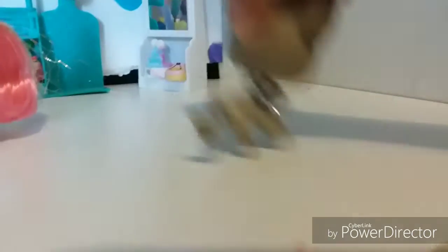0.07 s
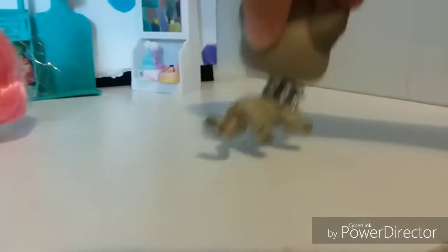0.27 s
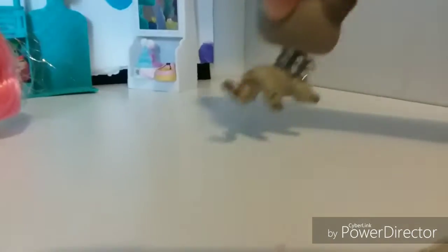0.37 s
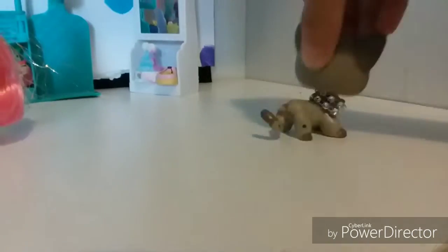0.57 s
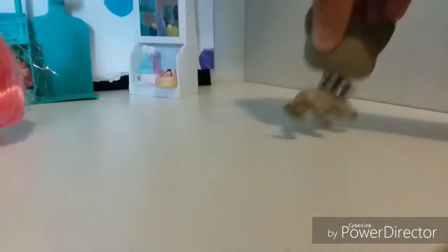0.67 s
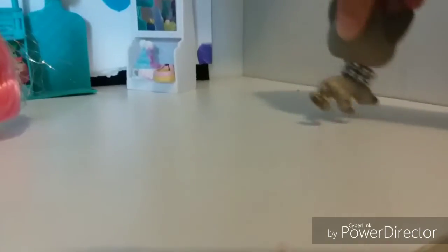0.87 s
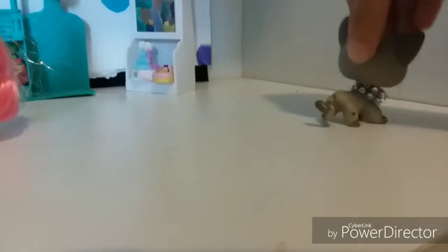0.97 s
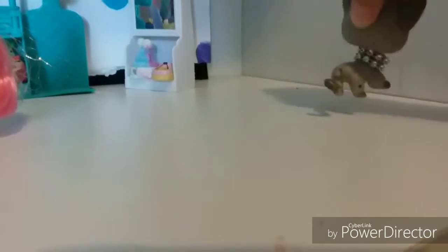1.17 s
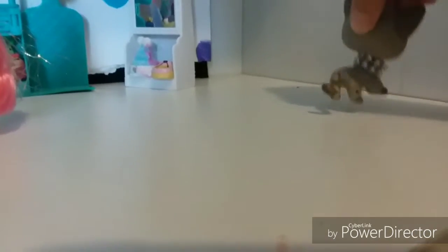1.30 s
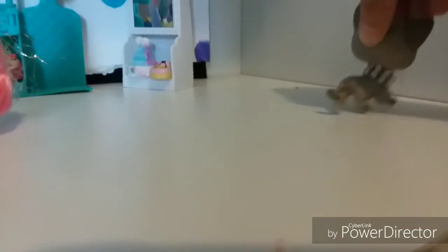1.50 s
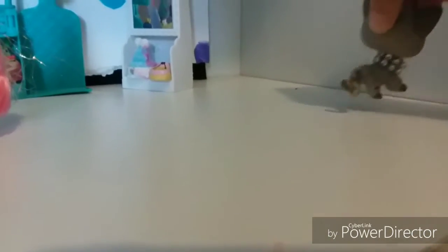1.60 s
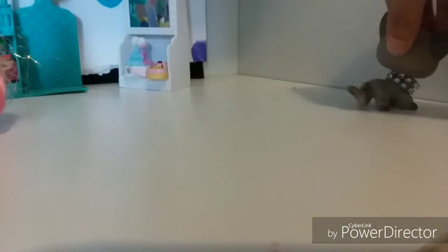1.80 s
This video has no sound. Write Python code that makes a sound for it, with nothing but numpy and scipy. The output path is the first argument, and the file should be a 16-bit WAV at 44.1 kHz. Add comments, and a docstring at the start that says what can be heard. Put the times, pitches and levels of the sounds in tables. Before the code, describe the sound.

Plastic toy knocked step by step across a hard table indoors, close, over low hum and hiss

```python
"""Throughout: low rumble and a narrow hum under the microphones' hiss, all shaped noise but the hum's steady sine.
A small plastic figure hops along a hard tabletop, close to a stereo recorder standing on it: one landing has
begun just before 0 s, the others follow near 0.2, 0.6, 1.1 and 1.5 s. A landing is a cluster of contacts: one
foot, the body's weight, a light rebound. Each contact sums decaying tabletop modes, a plastic clatter of
decaying noise and a room tail."""
import sys
import numpy as np
from scipy import signal
from scipy.fft import rfft, irfft, next_fast_len
from scipy.io import wavfile

SR = 44100
rng = np.random.default_rng(int(sys.argv[2]) if len(sys.argv) > 2 else 0)


def unload_wav(signal):
    """Save mono or channel-first audio to the path in sys.argv[1] as 16-bit WAV at rate SR, clipped to [-1, 1]."""
    wavfile.write(
        sys.argv[1],
        SR,
        np.round(np.clip(np.atleast_2d(signal).T, -1, 1) * 32767).astype(np.int16),
    )


def convert_level_to_amplitude(level_db):
    """Map a level in decibels to its linear amplitude factor."""
    exponent = np.asarray(level_db, float) / 20
    return 10 ** exponent


N = 81585  # samples


def unit(x):
    """Scales to rms 1 over both channels."""
    return x / np.sqrt(np.mean(x ** 2) + 1e-20)


def along(points, hz):
    """Interpolates (frequency [Hz], value) points on a log frequency axis."""
    f, v = np.transpose(points)
    return np.interp(np.log(hz + 1), np.log(f + 1), v)


def balance(left_over_right_db):
    """Left and right gains, the level difference split evenly."""
    return convert_level_to_amplitude([[left_over_right_db / 2], [-left_over_right_db / 2]])


def filtered(x, response):
    """Multiplies the spectrum of x by a response of frequency."""
    n = x.shape[-1]
    m = next_fast_len(n + 8192)
    return irfft(rfft(x, m) * response(np.fft.rfftfreq(m, 1 / SR)), m)[..., :n]


def stereo_noise(n, gain, alike):
    """Coloured noise; mid and side shares set the left-right correlation per frequency."""
    def response(hz):
        angle = np.arccos(np.clip(alike(hz), -1, 1)) / 2
        return gain(hz) * np.array([np.cos(angle), np.sin(angle)])
    mid, side = filtered(rng.standard_normal((2, n)), response)
    return np.array([mid + side, mid - side])


def dying(noise, t60_points):
    """Decays each band of the noise exponentially at its own t60."""
    hz, t, z = signal.stft(noise, SR, nperseg=128)
    t60_s = along(t60_points, hz)[:, None]
    decayed = signal.istft(z * convert_level_to_amplitude(-60 * t / t60_s), SR, nperseg=128)[1]
    return decayed[:, :noise.shape[1]]


def hiss():
    """Microphone self-noise, independent at the two ports."""
    # hiss spectrum: (frequency [Hz], relative level [dB])
    spectrum = [(300, 10), (1000, 6), (3000, 2), (6000, -1.5), (10000, -0.5), (15000, 0.5), (16000, -5.5)]
    noise = stereo_noise(N, lambda hz: convert_level_to_amplitude(along([(100, -22)] + spectrum, hz)), lambda hz: 0 * hz)
    return convert_level_to_amplitude(-76) * unit(noise)


def rumble():
    """Low room noise, nearly the same at both ports in the bass."""
    # rumble spectrum: (frequency [Hz], relative level [dB])
    spectrum = [(22, -47), (45, -18), (62, 0.5), (88, -1.5), (120, -8.5), (170, -9.5), (290, -21),
                (340, -35.5), (435, -22.5), (520, -48.5), (900, -62)]
    # rumble at the two ports: (frequency [Hz], left-right correlation [-1..1])
    likeness = [(60, .985), (100, .96), (290, .89), (640, .4)]
    points = [(8, -100)] + spectrum + [(3000, -100)]
    noise = stereo_noise(N, lambda hz: convert_level_to_amplitude(along(points, hz)), lambda hz: along(likeness, hz))
    return convert_level_to_amplitude(-57) * unit(noise)


def hum():
    """A steady sine blurred by narrow-band noise at the same pitch."""
    pitch_hz, width_hz = 220.9, 12
    steady_power, alike = 0.7, 0.95
    level_db, pan_db = -59, 2.5
    blur = unit(stereo_noise(N, lambda hz: 1 / (1 + (2 * (hz - pitch_hz) / width_hz) ** 4),
                             lambda hz: alike + 0 * hz))
    tone = np.sqrt(2) * np.sin(2 * np.pi * pitch_hz * np.arange(N) / SR)
    mixed = np.sqrt(steady_power) * tone + np.sqrt(1 - steady_power) * blur
    return convert_level_to_amplitude(level_db) * balance(pan_db) * mixed


def room_tail(hit):
    """Left port of the hit convolved with fresh stereo noise, each band decaying at its own rate."""
    # room decay: (frequency [Hz], t60 [s])
    decay = [(200, .2), (800, .17), (2000, .18), (5000, 0.14), (12000, 0.1698)]
    # room tail at the two ports: (frequency [Hz], left-right correlation [-1..1])
    likeness = [(100, 0.81), (300, 1), (700, 0.26), (2000, .2)]
    level_db, pan_db = -18.5, 1
    tail = dying(stereo_noise(SR // 2, np.ones_like, lambda hz: along(likeness, hz)), decay)
    wet = signal.fftconvolve(hit[:1], tail / np.linalg.norm(tail[0]), axes=1)
    return convert_level_to_amplitude(level_db) * balance(pan_db) * wet


def tabletop_ring(t, build_s, colour_db, spot_hz):
    """Decaying sines, one per mode; low modes build up slower, modes near spot_hz are favoured."""
    # tabletop modes: [frequency [Hz]]
    mode_hz = [128, 203, 297, 402, 590, 675, 762, 900, 1064, 1172, 1207, 1309, 1560, 1750, 1836, 2050, 2238,
               2340, 2600, 2870, 3100, 3520, 3900, 4850]
    # same modes: (relative level [dB], t60 [s], left over right [dB], left phase lead [rad])
    modes = [(-13, 0.12, 3.5, 1.25), (-7, 0.19, 5.5, 7), (-4.5, .07, -8.5, 0.18), (-11.5, 0.13, -1.5, 1),
             (-4.5, 0.12, 3.5, 2.58), (-10, 0.064, 8, -0.4), (-4, 0.044, 4, 0.3), (-13.5, .09, -4, 1.2),
             (-13.5, 0.097, 9.5, -3.7), (-7, 0.087, 4, -2), (-4.5, 0.079, 3.5, 0.27), (-6, .06, 2, -0.5),
             (-1.5, 0.047, 2, 1.5), (-6, .05, 16, 2.5), (-7.5, 0.071, 7, 1.5), (-4, 0.047, 8, -1.8),
             (-3.5, .045, 3, -6.1), (-12.5, 0.017, 7.5, -2.4), (-4.5, 0.024, -3.5, -4.6),
             (-10.5, .04, -1.5, -1.82), (-15.5, 0.059, 4.5, -2), (-13, 0.036, 5, 2.9), (-17, .05, -1, -2),
             (-32.5, .04, 3.5, 1)]
    favour_db, favour_octaves = 7, 0.17
    scatter_db, build_cycles = 2, 0.97
    hz = np.array(mode_hz)[:, None]
    level_db, t60_s, pan_db, lead_rad = np.transpose(modes)[:, :, None]
    octaves_off = np.log2(hz / spot_hz)
    level_db = level_db + favour_db * np.exp(-0.5 * (octaves_off / favour_octaves) ** 2)
    level_db = level_db + colour_db(hz) + scatter_db * rng.standard_normal(hz.shape)
    envelope = convert_level_to_amplitude(level_db - 60 * t / t60_s)
    envelope = envelope * (1 - np.exp(-t / (build_s + build_cycles / hz)))
    phase = 2 * np.pi * hz * t + rng.uniform(0, 2 * np.pi, hz.shape)
    left = np.sum(envelope * convert_level_to_amplitude(pan_db / 2) * np.sin(phase + lead_rad / 2), axis=0)
    right = np.sum(envelope * convert_level_to_amplitude(-pan_db / 2) * np.sin(phase - lead_rad / 2), axis=0)
    return np.array([left, right])


def plastic_clatter(t, build_s, colour_db):
    """Noise burst with band-wise decay, weaker and later at the right port."""
    # clatter spectrum: (frequency [Hz], relative level [dB])
    spectrum = [(240, -35), (400, -8.5), (940, -2), (1430, -12), (2300, -5), (3000, -5), (4000, -12.5),
                (5500, -26.5), (8000, -34), (9300, -42), (12500, -39.5), (15300, -44), (16000, -60.5)]
    # clatter decay: (frequency [Hz], t60 [s])
    decay = [(400, 0.0706), (1500, 0.074), (4000, 0.028), (12000, 0.047)]
    level_db, pan_db, alike, lag_s = 14.5, 10, 0.5, 0.0004
    noise = stereo_noise(len(t), lambda hz: convert_level_to_amplitude(along(spectrum, hz) + colour_db(hz)),
                         lambda hz: alike + 0 * hz)
    left, right = dying(noise, decay) * (1 - np.exp(-t / build_s))
    late_right = np.pad(right, (round(lag_s * SR), 0))[:len(t)]
    return convert_level_to_amplitude(level_db) * balance(pan_db) * np.array([left, late_right])


def contact(build_s, thump_db, knock_db, clack_db, click_db, spot_hz):
    """One contact: modal ring plus clatter, both tilted by the contact's own colour."""
    # colour bands, thump, knock, main ring (0 dB), clack, click: [frequency [Hz]]
    band_hz = [250, 650, 1200, 2500, 7000]
    colour = list(zip(band_hz, (thump_db, knock_db, 0, clack_db, click_db)))
    colour_db = lambda hz: along(colour, hz)
    t = np.arange(SR // 3) / SR
    return tabletop_ring(t, build_s, colour_db, spot_hz) + plastic_clatter(t, build_s, colour_db)


def figure():
    """Sums the hopping figure's contacts, each followed by its own room tail."""
    # contacts: (time [s], level [dB], build-up [s], thump [dB], knock [dB], clack [dB], click [dB],
    # pitch favoured by the spot [Hz]); colour columns are relative to the usual colour
    contacts = [(-.045, -24.5, 0.006, -3.5, 5, 1, 8, 940), (.021, -54, 0.00059, 2, -1.5, -12.5, -13, 2200),
                (0.194, -76.5, 0.00046, -5, 9, -1, -14, 2130), (0.2177, -34, 0.0028, 13, 8.5, 3.5, 11, 656),
                (.228, -17.5, 0.0019, -1, -8.5, 0.5, 5.5, 2850),
                (0.263, -42, 0.0022, -12, -12, 1.5, 5, 1760), (0.311, -52, 0.00039, 0, 6, 2, 12, 725),
                (0.629, -30, 0.0023, -1, -7, -5, 7.5, 780), (.6425, -22.5, 0.0011, -5, -5.5, 2, 1.5, 1470),
                (0.6493, -28.5, 0.00042, -18.5, 2, -2.5, 3, 1195),
                (.713, -52.5, 0.00025, 11, 0.5, 0, 18, 690), (1.051, -42, .001, -2.5, 1.5, -13.5, -2, 940),
                (1.058, -45, .002, 12, 3, -22, -8, 255), (1.069, -45.5, 0.00089, -5.5, 9, -10, 1, 3520),
                (1.081, -34.5, 0.00082, -10, 5, -5.5, -25.5, 1216),
                (1.133, -49.5, .0005, 5, 4, -1, 6.5, 660), (1.484, -36.5, 0.00099, 5.5, -4.5, -5.5, 4, 232),
                (1.504, -47, 0.00095, -10.5, 18.5, -1, 10, 3500),
                (1.508, -36, 0.00089, -0.5, -1.5, -0.5, 0, 610),
                (1.567, -56, 0.00087, 17, 12.5, 4, 12, 2630)]
    lead = SR // 10  # samples kept before time zero
    tail_delay_s = 0.01
    out = np.zeros((2, lead + N + SR))
    for time_s, level_db, *kind in contacts:
        hit = convert_level_to_amplitude(level_db) * contact(*kind)
        wet = room_tail(hit)
        at = lead + round(time_s * SR)
        out[:, at:at + hit.shape[1]] += hit
        at += round(tail_delay_s * SR)
        out[:, at:at + wet.shape[1]] += wet
    return out[:, lead:lead + N]


def scene():
    """Sums hiss, rumble, hum and figure."""
    return hiss() + rumble() + hum() + figure()


def top_cut(x):
    """Nothing passes above the cut-off."""
    return signal.sosfilt(signal.butter(12, 16250, fs=SR, output="sos"), x)


def record(dry):
    """The microphones lose the deepest bass: second-order high-pass at 35 Hz."""
    sos = signal.butter(N=2, Wn=35, btype="high", fs=SR, output="sos")
    mix = signal.sosfilt(sos, dry)
    return top_cut(mix)


dry = scene()
out = record(dry)
unload_wav(out)
```